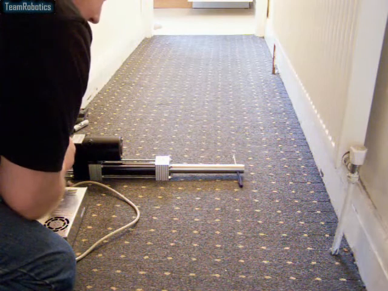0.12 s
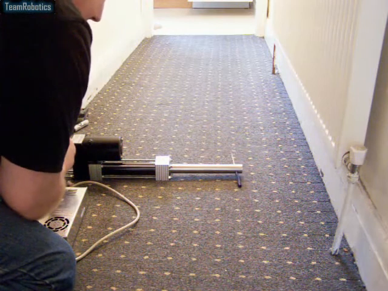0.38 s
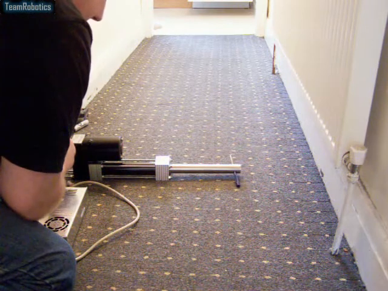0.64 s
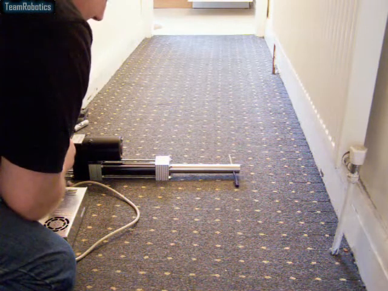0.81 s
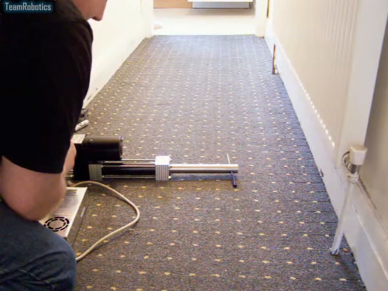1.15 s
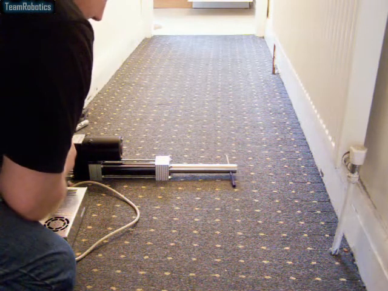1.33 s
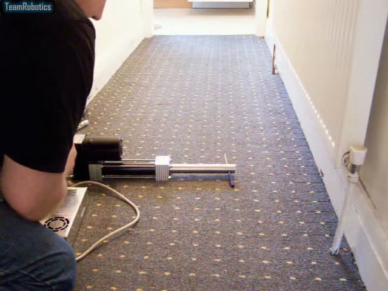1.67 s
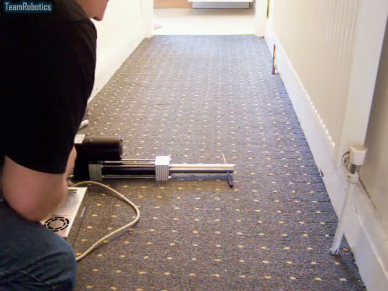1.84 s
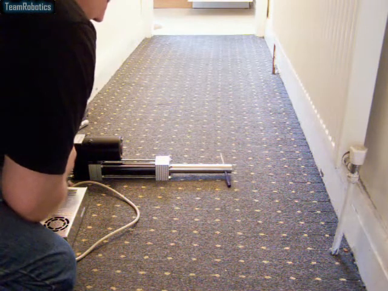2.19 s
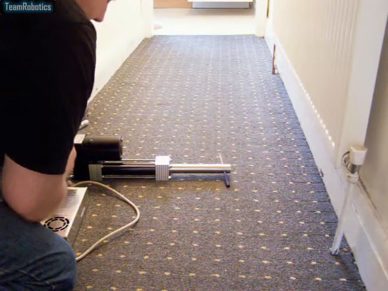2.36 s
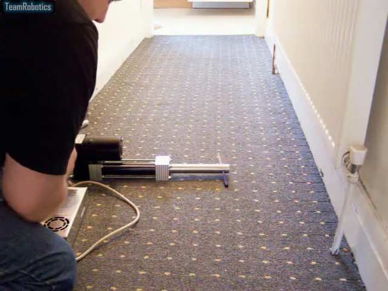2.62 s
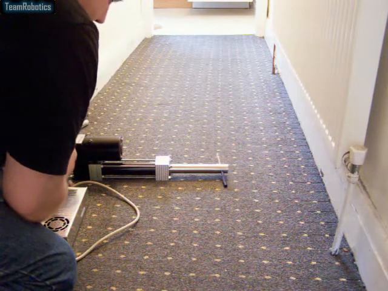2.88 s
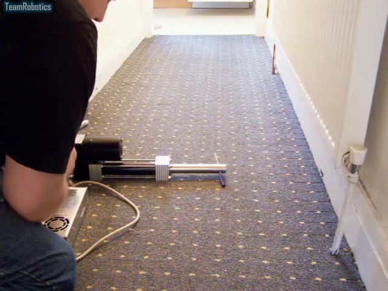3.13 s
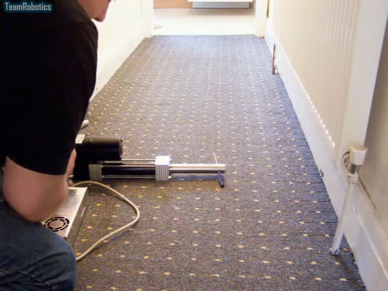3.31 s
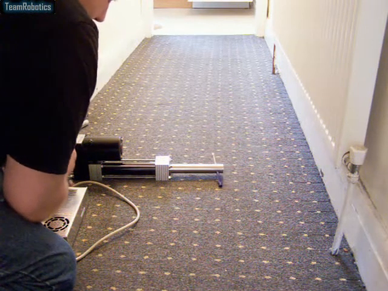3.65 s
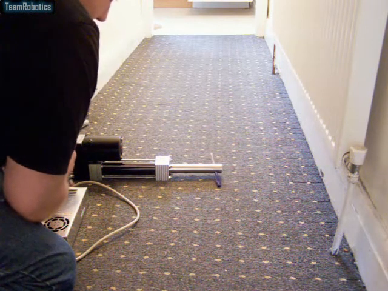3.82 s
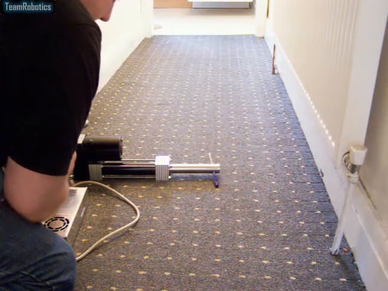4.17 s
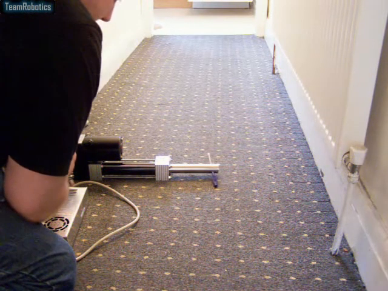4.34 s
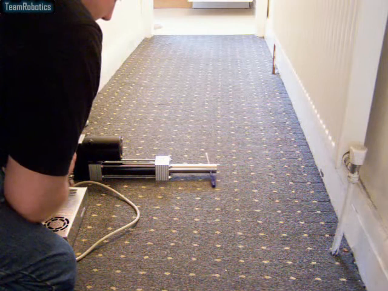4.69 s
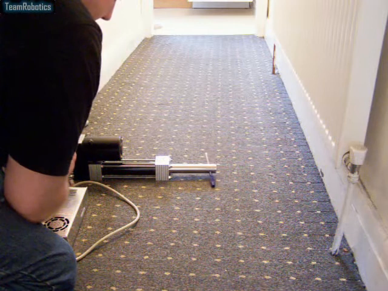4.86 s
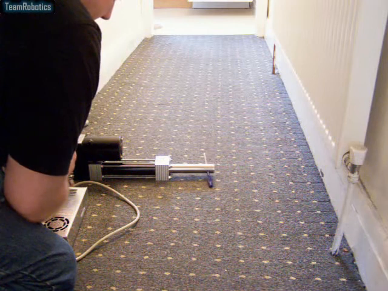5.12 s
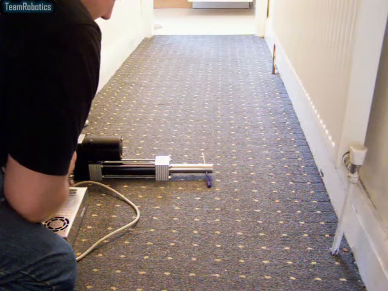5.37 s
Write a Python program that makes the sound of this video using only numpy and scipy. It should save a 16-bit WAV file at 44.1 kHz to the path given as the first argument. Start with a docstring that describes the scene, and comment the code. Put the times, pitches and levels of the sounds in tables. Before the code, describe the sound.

A small electric actuator motor runs with a steady raspy whir, and midway its dry screw starts a shrill, chirping squeal.

```python
"""Linear actuator with a dry screw

On a corridor carpet, over a low rumble, an actuator draws its rod in at a near-steady speed.
Brushes rasp into the ringing motor housing, gears whine and hum, and the shortening rod rings less.
Midway the lead screw runs dry and squeals, chirping upward twice per turn, then settles on a lower,
rougher note. Automatic gain control keeps the overall level even."""
import sys
import numpy as np
from scipy import signal
from scipy.fft import rfft, irfft
from scipy.io import wavfile
from scipy.ndimage import uniform_filter1d, map_coordinates

SR = 44100
rng = np.random.default_rng(int(sys.argv[2]) if len(sys.argv) > 2 else 0)


def generate_wav(signal):
    """Clip the signal to [-1, 1] and save it as 16-bit WAV at the path in sys.argv[1]."""
    frames = np.transpose(np.atleast_2d(signal))
    scaled = np.clip(frames, -1, 1) * 32767
    pcm = np.round(scaled).astype(np.int16)
    wavfile.write(sys.argv[1], SR, pcm)


N = 242550
TIME = np.arange(N) / SR
FREQS = np.maximum(np.fft.rfftfreq(N, 1 / SR), 1)


def from_db(db):
    """Decibels to gain."""
    return 10 ** (np.asarray(db) / 20)


def rms_one(x):
    """Scale to rms 1."""
    return x / np.sqrt(np.mean(x ** 2) + 1e-20)


def in_time(rows):
    """One automation curve for each column after the time."""
    times, *columns = np.transpose(rows)
    return [np.interp(TIME, times, column) for column in columns]


def spectrum_db(points):
    """An EQ curve through the points, rolling off beyond its ends."""
    hz, db = np.transpose(points)
    outside = np.maximum(FREQS / hz[-1], 1) * np.maximum(hz[0] / FREQS, 1)
    return np.interp(np.log(FREQS), np.log(hz), db) - 20 * np.log(outside)


def resonance_db(modes):
    """An EQ curve with a bell boost for each resonance."""
    return sum(db * .5 ** ((2 * (FREQS - hz) / width) ** 2) for hz, width, db in modes)


def colour(x, db):
    """Pass a sound through an EQ curve; rms 1."""
    return rms_one(irfft(rfft(x) * from_db(db), N))


def drift(rate_hz):
    """Smooth random modulation at about this rate; rms 1."""
    return colour(rng.standard_normal(N), -20 * np.log10(1 + (FREQS / rate_hz) ** 2))


def tone(hz):
    """A sine of rms 1 that follows a pitch curve."""
    return np.sqrt(2) * np.sin(2 * np.pi * (np.cumsum(hz) / SR + rng.random()))


def shaft_tones(table, speed, waver_db, smear_hz):
    """Partials that track the shaft speed, each wavering a little on its own."""
    pace = speed / np.mean(speed)
    return sum(from_db(db + waver_db * drift(12)) * tone(hz * pace + smear_hz * drift(14.54))
               for hz, db in table)


# EQ of the corridor's rumble: f/Hz, level/dB
RUMBLE_EQ = [(20, -10.5), (35, -6), (52, 3.5), (75, -1), (100, 3), (125, -6.5), (150, -5), (200, -11),
             (240, 0), (310, -13), (450, -36.5)]
# fader of the rumble: t/s, level/dB
RUMBLE_FADER = [(0, -50.5), (.7, -52.5), (1.8, -52.5), (2.5, -53), (5.5, -53)]
def rumble():
    """A bed of low noise in the corridor."""
    return from_db(in_time(RUMBLE_FADER)[0]) * colour(rng.standard_normal(N), spectrum_db(RUMBLE_EQ))


# rows for frame drone, gear whir and rod ring: level with rod out/dB, level with rod in/dB
BAND_LEVELS = [(-48, -46), (-41, -42.5), (-35.5, -41.5)]
def retraction(midpoint_s, ease_s):
    """Three faders in dB: as the rod draws in, its ring fades, the whir eases and the drone grows."""
    drawn_in = (1 + np.tanh((TIME - midpoint_s) / ease_s)) / 2
    return [out_db + (in_db - out_db) * drawn_in for out_db, in_db in BAND_LEVELS]


def brushes(speed, repeat_share, grain_db, lope_db):
    """The brushes cross the same rough track on every turn; the rest is fresh sparking."""
    shaft = np.cumsum(speed) / SR
    size = int(SR / np.mean(speed))
    track = irfft(np.exp(2j * np.pi * rng.random(size // 2 + 1)), size)
    looped = rms_one(map_coordinates(track, [shaft % 1 * size], order=3, mode="grid-wrap"))
    sparks = rms_one(rng.standard_normal(N) * from_db(grain_db * drift(400)))
    friction = np.sqrt(repeat_share) * looped + np.sqrt(1 - repeat_share) * sparks
    # contact pressure swings with the shaft angle
    pressure = sum(np.sin(2 * np.pi * (k * shaft + rng.random())) for k in (1, 3, 6))
    return friction * from_db(lope_db * pressure)


# broad EQ of the drive: f/Hz, level/dB
DRIVE_EQ = [(200, -26.5), (330, -25), (550, -16), (800, -19), (1030, -15.5), (1310, -22.5), (1550, -16),
            (2000, -5), (2500, -1.7), (3050, -0.5), (3700, -0.7), (4400, -6), (4850, -10.5), (7150, -17.5)]
# housing resonances: f/Hz, width/Hz, boost/dB
HOUSING_MODES = [(1637, 28, 5), (1945, 70, 5), (2035, 40, 3), (2326, 28, 3), (2412, 36, 7), (2519, 30, 6),
                 (2608, 30, 4), (2929, 70, 4.5), (3004, 28, 3), (3047, 45, 7), (3155, 48, 10),
                 (3392, 42, 8), (3650, 35, 4), (3854, 28, 3.5), (4296, 45, 4.4), (5140, 110, 3),
                 (5300, 70, 4), (5375, 45, 8), (5472, 95, 11), (5577, 45, 4), (6040, 110, 3),
                 (6160, 30, 7.5), (6298, 110, 4), (6400, 75, 9.5), (6970, 50, 4)]
def motor(speed, drone_db, whir_db, rod_db, rasp_db):
    """Friction rings the housing; frame, gearbox, rod and motor each radiate their own band."""
    friction = brushes(speed, repeat_share=.31, grain_db=1.5, lope_db=.04)
    rest = rfft(colour(friction, spectrum_db(DRIVE_EQ) + resonance_db(HOUSING_MODES)))
    out = 0
    for crossover_hz, level_db in ((790, drone_db), (1400, whir_db - 3.5), (1880, rod_db - .4)):
        band = rest / (1 + (FREQS / crossover_hz) ** 36)
        out = out + from_db(level_db) * rms_one(irfft(band, N))
        rest = rest - band
    return out + from_db(rasp_db) * rms_one(irfft(rest, N))


# fader of the gear mesh hum: t/s, level/dB
HUM_FADER = [(0.0, -58.5), (1.06, -51), (1.77, -48), (4.68, -56), (5.35, -58)]
# shaft and gear partials at mean speed: f/Hz, relative level/dB
GEAR_PARTIALS = [(509, -27), (581, -19.5), (690, -23), (866.7, -11), (981, -10), (1017.5, -12),
                 (1090, -8.5), (1410, -10.5), (1562.5, -16.5), (1634, -12.5), (1779, -10), (1929, 2),
                 (1962, -3.5), (1998, -3.5)]
def gears(speed, whir_db, load, whine_throb_db, hum_throb_db):
    """The teeth whine and the first mesh hums; both throb with the load."""
    mesh_hz = 7.49 * speed
    hum = from_db(in_time(HUM_FADER)[0] + hum_throb_db * load + .8 * drift(9)) * tone(mesh_hz)
    whine = shaft_tones(GEAR_PARTIALS, speed, waver_db=2, smear_hz=2)
    return from_db(whir_db - 1.5 + whine_throb_db * load) * whine + hum


# commutator partials at mean speed: f/Hz, relative level/dB
COMMUTATOR_PARTIALS = [(2325, -19), (2412, -25.5), (2519, -21.5), (2613, -17.5), (3044, -21.5),
                       (3141, -16.5), (3165, -17.5), (3396, -15.5), (5479, -22), (6163, -23), (6374, -26)]
def commutator(speed, gain_db):
    """The spinning commutator lays a thin, wavering whistle over the rasp."""
    return from_db(gain_db) * shaft_tones(COMMUTATOR_PARTIALS, speed, waver_db=3.5, smear_hz=5.02)


def stick_slip(curve, swell_db, flutter_hz, scrape_below_hz, scrape_width_hz, rough, catch_db):
    """The dry nut grips and slips: a fluttering note that keeps catching, over a broad scrape."""
    pitch, note_db, scrape_db = in_time(curve)
    inside_s = np.minimum(TIME - curve[0][0], curve[-1][0] - TIME)
    gate = np.clip(inside_s / .02 + .5, 0, 1)   # 20 ms fades
    grip = rms_one((1 + rough * drift(150)) * from_db(catch_db * drift(30)))
    note = grip * tone(pitch + flutter_hz * np.tanh(drift(130)))
    grit = colour(rng.standard_normal(N), -10 * np.log10(1 + (FREQS / scrape_width_hz) ** 8))
    scrape = grit * tone(pitch - scrape_below_hz + 120 * drift(201.3))
    return gate * (from_db(note_db) * note + from_db(scrape_db + swell_db) * scrape)


# the screw's first squeal: t/s, f/Hz, note level/dB, scrape level/dB
HIGH_SQUEAL_CURVE = [(2.1, 5000, -56, -39), (2.33, 4930, -41, -28), (2.41, 4750, -25, -31),
                     (2.53, 4720, -36.5, -21.5), (2.75, 4806, -30, -24), (3.04, 4680, -29.5, -22),
                     (3.13, 4720, -22.5, -20.5), (3.36, 4724, -23.5, -21), (3.41, 4540, -23, -20),
                     (3.71, 4550, -25, -21), (3.8, 4500, -33, -23), (3.99, 4435, -27.5, -20)]
def high_squeal(bite):
    """The screw runs dry and sings a thin note that sags in pitch."""
    return stick_slip(HIGH_SQUEAL_CURVE, swell_db=.5 * bite, flutter_hz=31.5,
                      scrape_below_hz=520, scrape_width_hz=350, rough=.43, catch_db=2.3)


CHIRP_HZ, BITE_PHASE = 4445, .8   # pitch at the top of a chirp's swell; its place in the half turn (0-1)
# screw resonances: f/Hz, width/Hz, boost/dB
SCREW_RESONANCES = [(3880, 200, 3.5), (4080, 130, 4), (4450, 170, 5)]
# how hard the nut bites: t/s, chirp level/dB, climb/Hz
BITE_CURVE = [(2.26, -19, 687), (2.37, -33, 705), (2.46, -17.5, 699), (3.35, -14, 704.5),
              (3.64, -16, 247.5), (3.82, -9.5, 99.4), (3.97, -9, 59.4)]
def chirps(turns, rise_s, fall_s, sweep_s):
    """Twice per turn the nut bites and its note sweeps up through the screw's resonances."""
    out, jitter = np.zeros(N), drift(270)
    bite_db, climb_hz = in_time(BITE_CURVE)
    bites = np.diff(np.floor(2 * turns - BITE_PHASE), prepend=0) > 0
    for i in np.flatnonzero(bites & (TIME > BITE_CURVE[0][0]) & (TIME < BITE_CURVE[-1][0])):
        near = np.abs(TIME - TIME[i]) < .08
        since, climb = TIME[near] - TIME[i], climb_hz[i]
        # a longer climb swells more slowly and rasps more
        attack_s = fall_s + rise_s * climb / CHIRP_HZ
        rasp_hz = (38 + .04 * climb) * jitter[near]
        swell = np.exp(-.5 * (since / np.where(since < 0, attack_s, fall_s)) ** 2)
        glide_hz = climb * (np.tanh(since / sweep_s + 1) - np.tanh(1)) / (1 + np.tanh(1))
        cycles = np.cumsum(CHIRP_HZ + glide_hz + rasp_hz) / SR + rng.random()
        out[near] += from_db(bite_db[i]) * swell * np.sin(2 * np.pi * cycles)
    return irfft(rfft(out) * from_db(resonance_db(SCREW_RESONANCES) - 3.5), N)


# single squeaks of the screw: t/s, level/dB, f/Hz
SQUEAK_CUES = [(3.862, -17.5, 4490), (3.961, -17, 4450), (4.213, -17.5, 3933), (4.295, -20, 3860),
               (4.381, -20, 3954), (4.639, -19.5, 4020), (4.785, -20.5, 3880), (4.825, -18.5, 3850),
               (4.872, -16, 3810)]
def squeaks(flutter_hz, swell_s):
    """Brief, nearly pure notes where the nut catches hard."""
    flutter = flutter_hz * drift(270)
    return sum(from_db(db) * np.exp(-.5 * ((TIME - at_s) / swell_s) ** 2) * tone(hz + flutter)
               for at_s, db, hz in SQUEAK_CUES)


# the screw's second squeal: t/s, f/Hz, note level/dB, scrape level/dB
LOW_SQUEAL_CURVE = [(4.0, 4110, -20, -25), (4.25, 3900, -21, -26), (4.48, 3943, -21.5, -24.5),
                    (4.56, 4030, -25, -26.5), (4.67, 3990, -20.5, -23.5), (4.87, 3864, -22.5, -32),
                    (5.0, 4000, -22.5, -24), (5.14, 4020, -42, -39)]
def low_squeal(bite):
    """The dry screw settles on a lower, rougher note with a wider flutter."""
    return stick_slip(LOW_SQUEAL_CURVE, swell_db=1.5 * bite, flutter_hz=118,
                      scrape_below_hz=430, scrape_width_hz=480, rough=.45, catch_db=1.4)


def corridor(x, t60_s, wet_db):
    """Close walls return a short, dense tail that the carpet soon soaks up."""
    tail = rng.standard_normal(N) * from_db(-60 * TIME / t60_s) * (TIME > .004)
    echoes = signal.fftconvolve(x, tail / np.sqrt(np.sum(tail ** 2)))[:N]
    return (x + from_db(wet_db) * echoes) / np.sqrt(1 + from_db(wet_db) ** 2)


def scene():
    """Mono mix of motor, gears and screw over the rumble; only the screw gets reverb."""
    speed = (36.28 + .027 * TIME) * (1 + .000987 * drift(7.6))   # motor turns/s, creeping up
    screw_turns = .15 * np.cumsum(speed) / SR   # geared down from the motor
    load = np.cos(2 * np.pi * screw_turns)   # the screw is slightly out of true: one swing per turn
    bite = np.cos(2 * np.pi * (2 * screw_turns - BITE_PHASE - .12))   # scrape peaks just after a chirp
    drone_db, whir_db, rod_db = retraction(midpoint_s=3.6, ease_s=.7)
    drive = motor(speed, drone_db, whir_db, rod_db, rasp_db=-19.63) * from_db(.35 * load)
    drive += gears(speed, whir_db, load, whine_throb_db=2, hum_throb_db=2.5)
    drive += commutator(speed, gain_db=-23.1)
    screw = high_squeal(bite) + low_squeal(bite)
    screw += chirps(screw_turns, rise_s=.074, fall_s=.01, sweep_s=.011)
    screw += squeaks(flutter_hz=22.26, swell_s=.011)
    return (drive + corridor(screw, t60_s=.13, wet_db=-11) + rumble())[None]


def record(dry):
    """Gain control ducks the motor while the screw squeals; a steep low-pass cuts the top."""
    target_db, window_s, cutoff_hz = -19, .25, 7150
    power = uniform_filter1d(dry ** 2, int(window_s * SR), axis=-1)
    levelled = dry * from_db(target_db) / np.sqrt(power)
    return signal.sosfilt(signal.cheby1(14, .2, cutoff_hz, fs=SR, output="sos"), levelled)


dry = scene()
out = record(dry)
generate_wav(out)
```